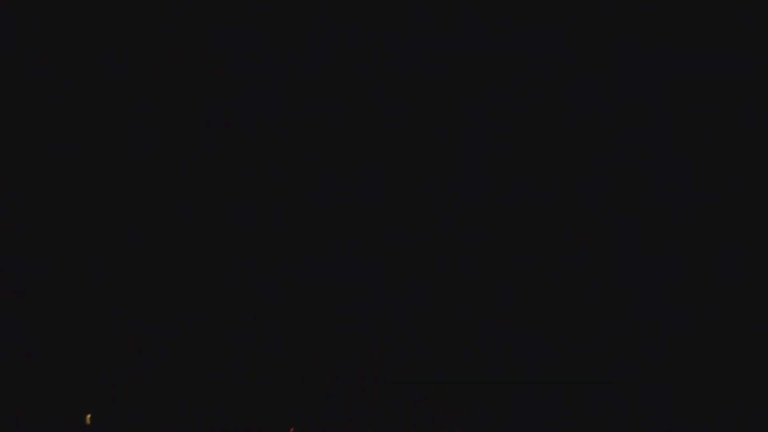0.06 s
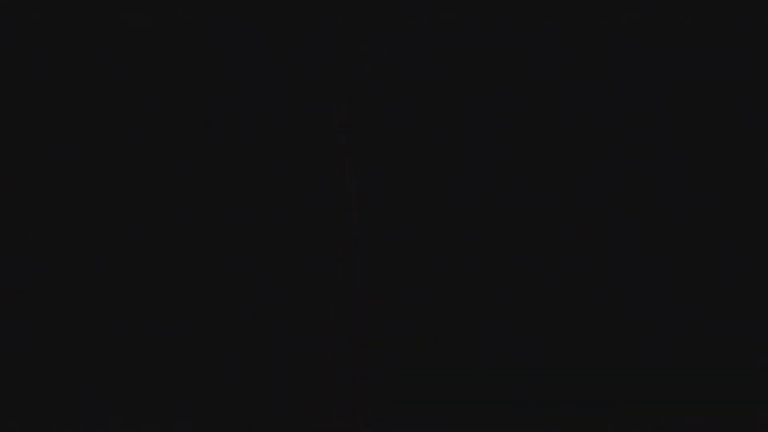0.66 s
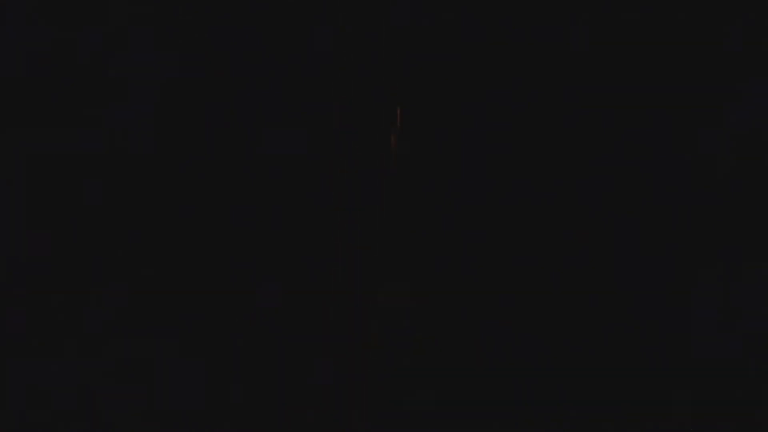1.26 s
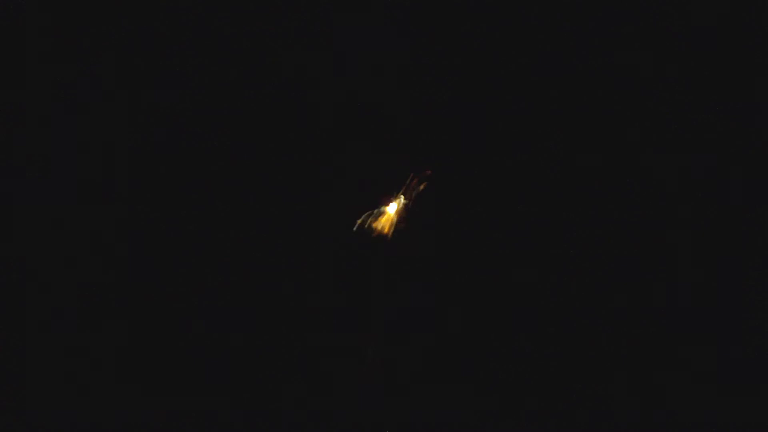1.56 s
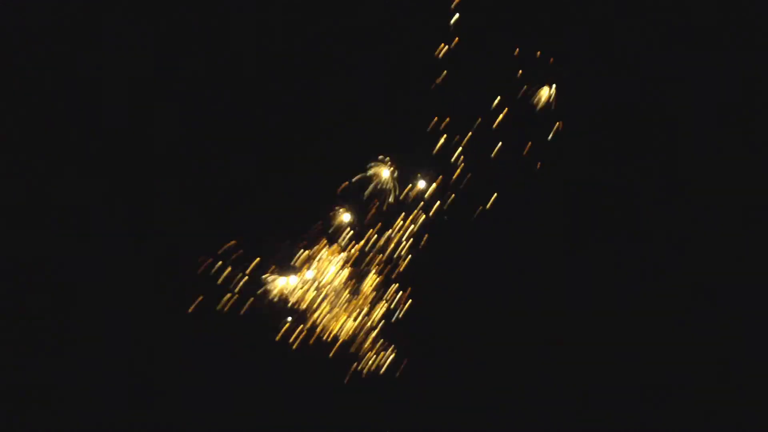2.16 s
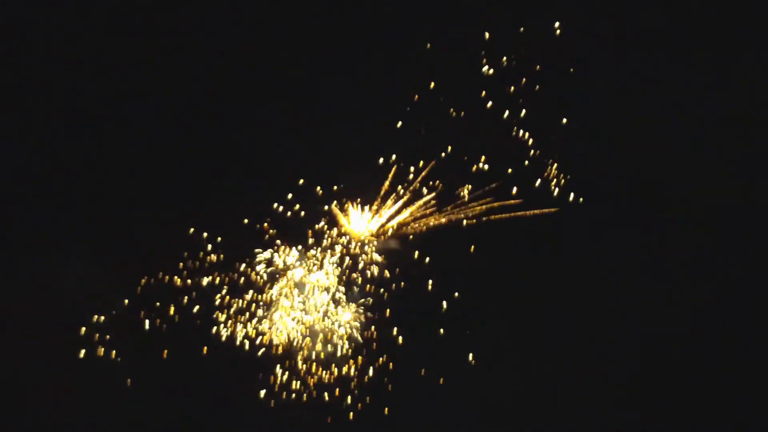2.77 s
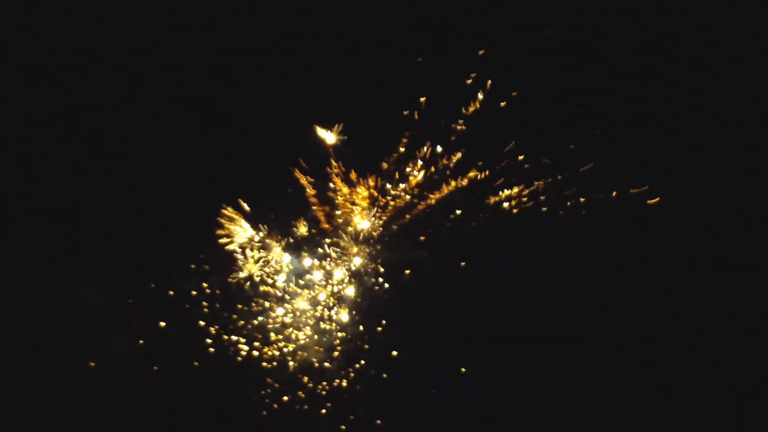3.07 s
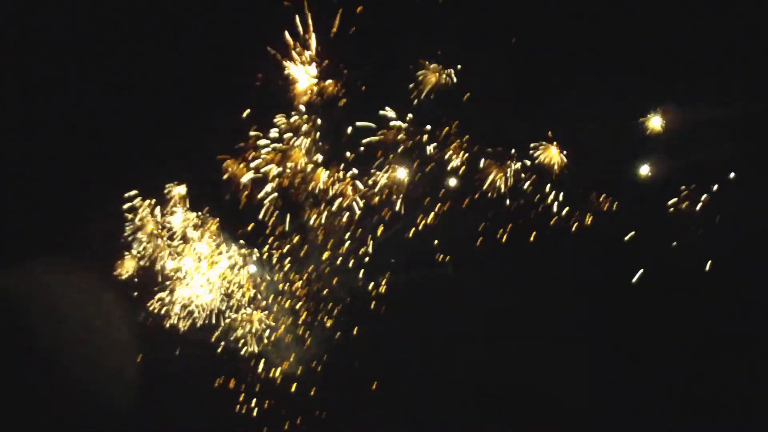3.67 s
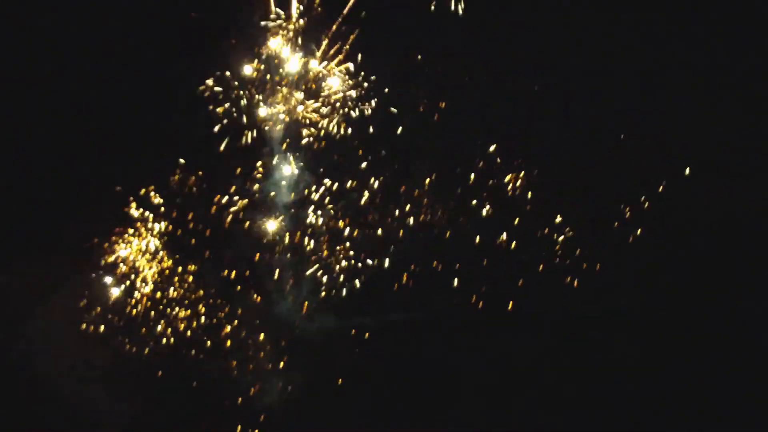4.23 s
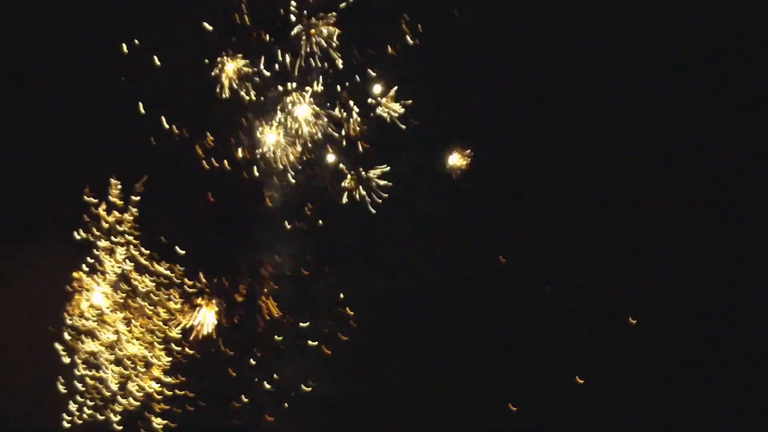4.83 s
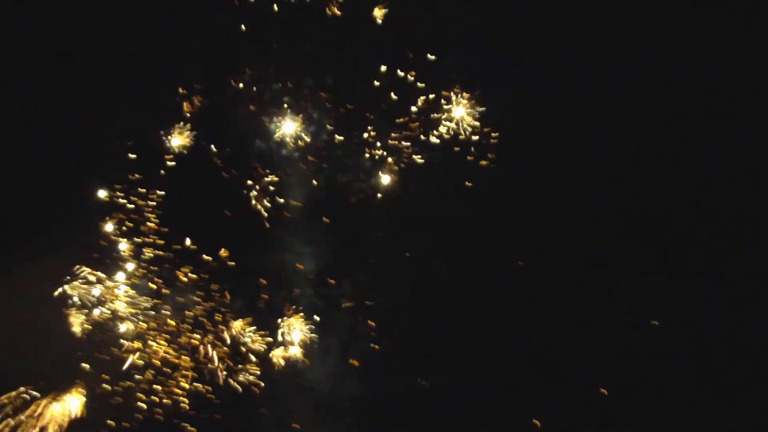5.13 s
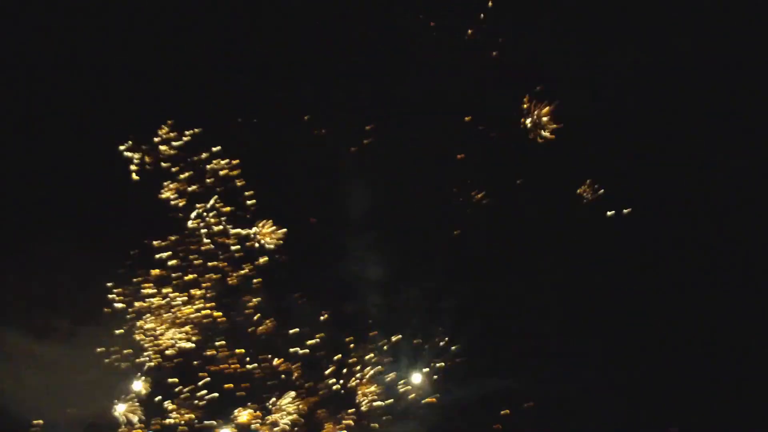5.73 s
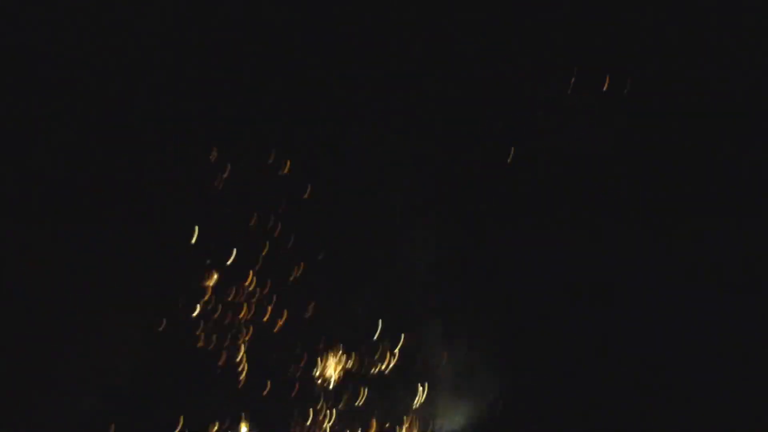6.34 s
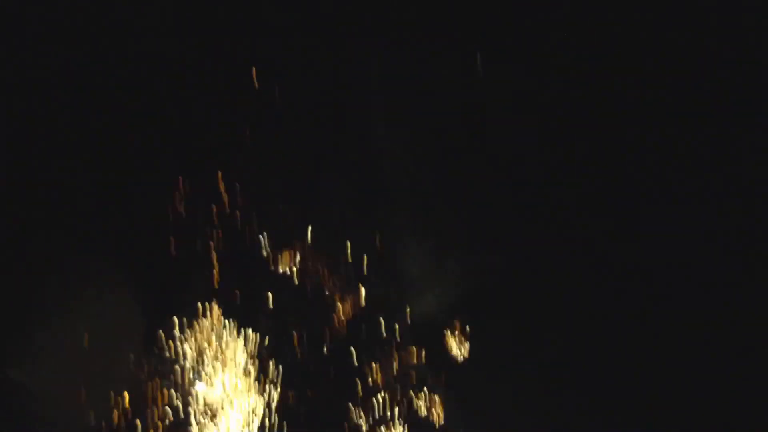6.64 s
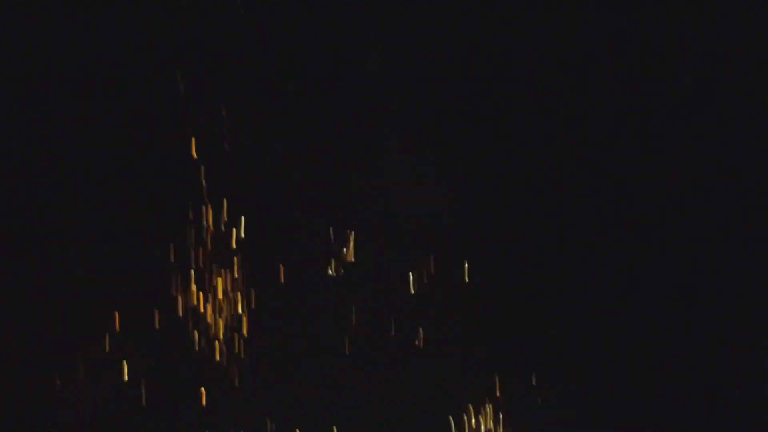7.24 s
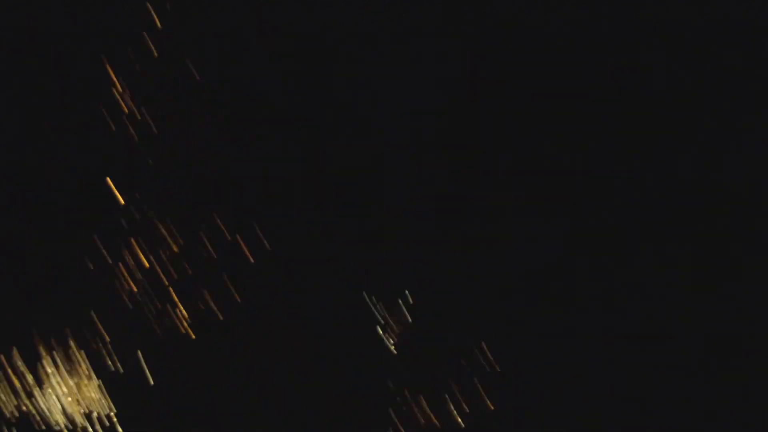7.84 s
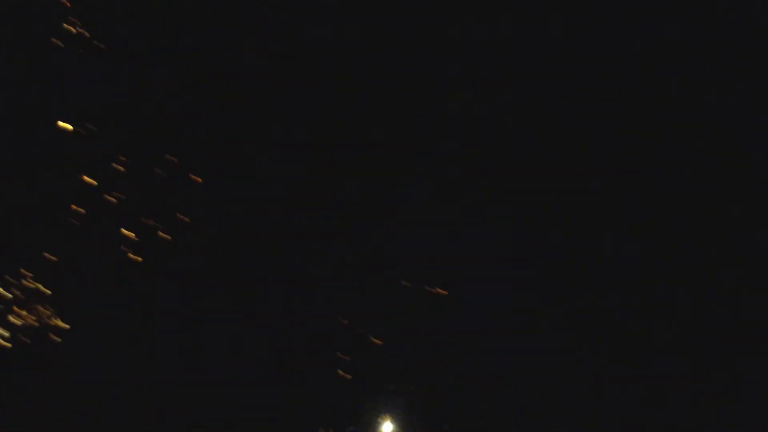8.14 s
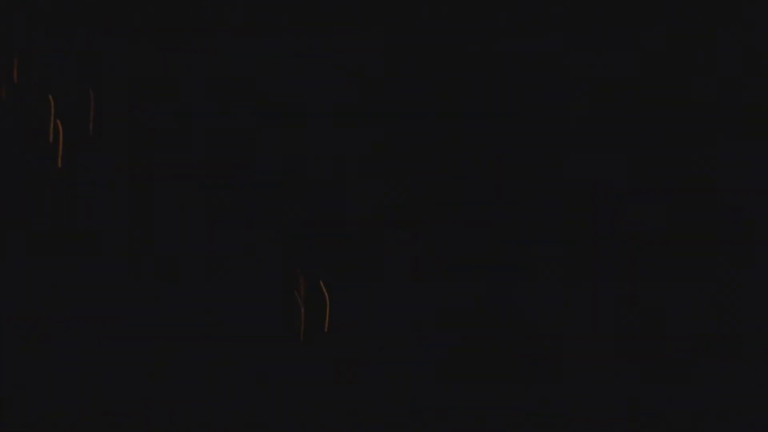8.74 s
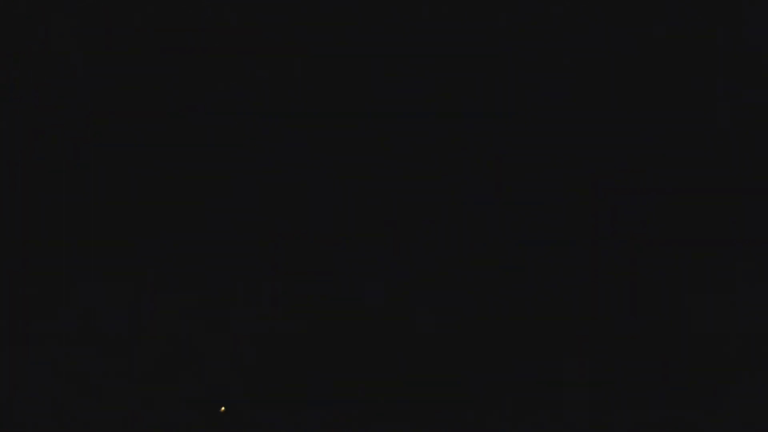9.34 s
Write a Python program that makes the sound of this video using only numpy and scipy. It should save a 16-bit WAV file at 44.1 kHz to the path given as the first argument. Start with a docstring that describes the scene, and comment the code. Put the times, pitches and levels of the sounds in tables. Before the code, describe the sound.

Two launch thumps lead into a run of loud, echoing firework bangs and sizzling crackle, with light wind on the microphone.

```python
"""A firework battery fires into the night sky, heard outdoors among houses on a small, wind-buffeted mic.
Two lift charges thump, a wall throws each back, and the climbing comets hiss. Shells burst overhead in
sharp double bangs, direct and off the ground, and roll back from distant houses. Their stars crackle
densely as the grains explode, thinning to a few last cracks over faint night noise.
The microphone overloads on the bangs and passes only a narrow band."""
import sys
import numpy as np
from scipy import signal
from scipy.fft import rfft, irfft
from scipy.io import wavfile
from scipy.ndimage import uniform_filter1d

SR = 44100
rng = np.random.default_rng(int(sys.argv[2]) if len(sys.argv) > 2 else 0)


def put_to_file(sound):
    """Save the sound as 16-bit audio at rate SR, in the file named by the first command-line argument."""
    columns = np.atleast_2d(sound).T  # one column per channel
    safe = np.clip(columns, -1, 1)
    whole_steps = np.round(safe * 32767)
    wavfile.write(sys.argv[1], SR, whole_steps.astype(np.int16))


N = 418950
TIME = np.arange(N) / SR

# Shells overhead; levels in all tables are relative, ahead of each layer's gain:
# (time [s], bang [dB], ground reflection lag [s], pitch [Hz], rolling echo [dB], crackling cloud [dB])
SHELLS = [(1.8601, 6, 0.0083, 699, -18.5, -22), (2.146, 14, 0.0082, 1180, -10, -22),
          (2.701, 7.5, 0.0085, 1130, -16.5, -24), (2.9418, 9.5, 0.0094, 700, -17, -43),
          (3.200, 10, 0.0089, 674, -9.5, -24), (3.3501, 15, 0.0091, 636, -22, -23.5),
          (3.7376, 12, 0.0086, 1110, -13, -33), (4.058, 1, 0.0093, 1170, -13.5, -24.5),
          (4.2754, 15, 0.0092, 667, -11, -23.5), (4.6055, 9.5, 0.0092, 675, -12.5, -24),
          (4.8691, 5, 0.0083, 677, -16, -21.5), (5.08, 8.5, 0.0082, 1120, -10.5, -25.5),
          (5.337, 11.5, .008, 1130, -11.5, -24), (5.628, 2, 0.0081, 1202, -15, -31.5),
          (6.048, 12, 0.0065, 1160, -19.5, -20), (6.3452, 12, 0.0069, 1130, -14, -21.5),
          (6.6424, 16, 0.0063, 1166, -13.5, -42), (6.877, -1, 0.0051, 1280, -16.5, -28.5),
          (7.163, 4.5, 0.0046, 869, -16.5, -28.5)]
# spectrum of a dull thud: (frequency [Hz], level [dB])
THUD_SPECTRUM = [(30, -1.5), (130, 5), (350, -2.5), (550, -18.5), (1100, -13.5), (3000, -23.5),
                 (7000, -32.5)]


def from_db(db):
    """Decibels to gain."""
    return 10 ** (np.asarray(db) / 20)


def rms_one(x):
    """Scale to unit rms."""
    return x / np.sqrt(np.mean(x ** 2) + 1e-20)


def level(rows, column=1):
    """Gain over time from a dB column, silent outside its span."""
    rows = np.array(rows)
    return from_db(np.interp(TIME, rows[:, 0], rows[:, column], left=-140, right=-140))


def at_hz(points, hz):
    """Read a table on a log-frequency axis."""
    points = np.array(points)
    return np.interp(np.log(np.maximum(hz, 1)), np.log(points[:, 0]), points[:, 1])


def colour(x, spectrum, size=8192):
    """Causal (minimum-phase) filter with the given spectrum and unit energy."""
    cepstrum = irfft(np.log(from_db(at_hz(spectrum, np.fft.rfftfreq(size, 1 / SR)))))
    cepstrum[1:size // 2] *= 2
    cepstrum[size // 2 + 1:] = 0
    response = irfft(np.exp(rfft(cepstrum)))
    return signal.oaconvolve(x, response / np.linalg.norm(response))[:len(x)]


def drift(per_s, size=4096):
    """A random wander of unit rms."""
    return rms_one(np.interp(TIME * per_s, np.arange(size), rng.standard_normal(size)))


def noise(spectrum, grit_db=0):
    """Coloured noise of unit rms; grit breaks it into grains."""
    grit = from_db(grit_db * np.minimum(drift(700, size=8192), 2.5))
    white = rng.standard_normal(N) * grit
    return rms_one(colour(np.concatenate([white[-SR:], white]), spectrum)[SR:])


def even(x, window_s):
    """Hold the running rms near 1."""
    power = np.abs(uniform_filter1d(x ** 2, max(int(window_s * SR), 2)))
    return x / np.sqrt(power + 1e-3 * np.mean(x ** 2))


def add(out, s, sound):
    """Mix a sound in at s seconds."""
    i = max(int(round(s * SR)), 0)
    out[i:i + len(sound)] += sound[:max(N - i, 0)]


def night():
    """Distant night noise and a faint hiss around the battery."""
    # background: (time [s], distant noise [dB], hiss [dB])
    levels = [(0, -45.5, -40.5), (1.3, -49, -45.5), (1.8, -47.5, -42), (8.7, -46.5, -50), (9.5, -46.5, -71)]
    # spectra of the distant noise and of the hiss: (frequency [Hz], level [dB])
    distant_spectrum = [(30, 4), (150, 4.5), (450, -1.5), (800, 6), (1300, -6), (3000, -12), (7000, -17)]
    hiss_spectrum = [(500, -2), (2500, 0.5), (4000, -0.5), (7000, -6.5)]
    return level(levels, 1) * noise(distant_spectrum) + level(levels, 2) * noise(hiss_spectrum)


def wind(gain_db=-3.5, gust_db=2, gusts_per_s=9):
    """Lumpy low pressure swings right at the microphone port, gusting about the wind's strength."""
    # wind on the microphone: (time [s], level [dB])
    strength = [(0.0, -8), (1.08, -20.5), (1.64, -7.5), (1.74, -15.5), (1.85, -3), (1.9, -18.5), (2.49, -7),
                (2.54, -12), (3.75, -24), (4.15, -32), (4.21, -19), (4.71, -31.5), (7.06, -25), (7.17, -13),
                (7.2, -19), (8.65, -34.5), (9.37, -32), (9.5, -41)]
    # its rumble: (frequency [Hz], level [dB])
    spectrum = [(8, 4.5), (20, 1.5), (36, 4.5), (60, -3.5), (110, -10.5), (170, -22), (300, -34.5),
                (1500, -51), (7000, -80)]
    gusts = from_db(gain_db + gust_db * drift(gusts_per_s))
    return gusts * level(strength) * even(noise(spectrum), window_s=0.15)


def buffets():
    """An eddy passing the microphone port sucks, then pushes."""
    # single eddies: (time [s], peak [dB], period [s])
    eddies = [(0.181, -7, 0.018), (0.255, -2.5, 0.022), (1.337, -8.5, 0.036), (1.53, -2, 0.013),
              (1.652, -0.5, 0.027), (1.832, -3, 0.036), (2.33, -6, 0.015), (2.446, -3.5, 0.017),
              (9.3, -23, 0.052)]
    out, t = np.zeros(N), TIME[:SR // 4] - 1 / 8
    for s, db, period in eddies:
        phase = 2 * np.pi * t / period
        add(out, s + t[0], from_db(db) * phase * np.exp((1 - phase ** 2) / 2))
    return out


def blast(spectrum, decay_s, front, size=4096):
    """A shock front and the turbulence behind it, with the energy of unit rms held for decay_s."""
    turbulence = rng.standard_normal(size) * np.exp(-TIME[:size] / decay_s)
    turbulence[0] = front * np.linalg.norm(turbulence)
    wave = colour(turbulence, spectrum)
    return wave / np.sqrt(np.sum(wave ** 2) / (decay_s * SR))


def swing(hz, cycles, slowing, size=4096):
    """The pressure swing of an explosion: a short push, then a longer suction, soon gone."""
    turns = np.log1p(slowing * hz * TIME[:size]) / slowing
    return np.sin(2 * np.pi * turns) * np.exp(-(turns / cycles) ** 2)


def launches(wall_lag_s=0.0655, wall_db=-11):
    """Each lift charge pushes out a pressure wave with a spitting blast; a wall throws the blast back."""
    # lift charges: (time [s], level [dB], length of the push [s])
    charges = [(0.3888, 16.5, 0.028), (1.847, 14, 0.00093)]
    # their spitting blast: (frequency [Hz], level [dB])
    spit_spectrum = [(30, 9), (150, -4.5), (380, 8), (600, 2.5), (1000, 5), (2800, 5), (7000, -5.5)]
    out, t = np.zeros(N), TIME[:4096]
    for s, db, push_s in charges:
        push = (1 - t / push_s) * np.exp(-t / push_s)
        echo_s, echo_gain = s + wall_lag_s, from_db(db + wall_db)
        add(out, s, from_db(db - 5) * push)
        add(out, s + 0.003, from_db(db - 2) * blast(spit_spectrum, decay_s=0.0059, front=1))
        add(out, s + 0.00714, from_db(db - 15) * swing(hz=141.5, cycles=1.35, slowing=0.38))
        add(out, echo_s, echo_gain * blast(spit_spectrum, decay_s=0.0026, front=0.34))
        # the low thud and its own echo
        add(out, s + 0.0046, from_db(db - 5.5) * blast(THUD_SPECTRUM, decay_s=0.0071, front=0.095))
        add(out, echo_s + 0.0062, echo_gain * blast(THUD_SPECTRUM, decay_s=0.0014, front=1))
    return out


def outdoors(x, near_db=-14, near_s=0.032, far_db=-19, build_up_s=0.0046, slap_s=0.058, width_s=0.013):
    """Nearby walls and trees scatter a short wash with one slap; a far tail dies first in the treble."""
    # far reverberation: (frequency [Hz], time to fall 60 dB [s])
    tail_t60 = [(100, 2.5), (800, 2.54), (3000, 1.1), (7000, 0.62)]
    # scattered sound grazes the ground, which cancels the low middle: (frequency [Hz], level [dB])
    grazing_spectrum = [(60, -1.5), (200, -2), (450, -6), (750, -1), (1100, -3), (1700, -5), (3200, 2),
                        (7000, 3.5)]
    t, edges_hz = TIME[:SR], np.geomspace(40, 12000, 8)
    white, far = rng.standard_normal(SR), np.zeros(SR)
    for low, high in zip(edges_hz, edges_hz[1:]):
        band_pass = signal.butter(2, [low, high], "band", fs=SR, output="sos")
        band = signal.sosfilt(band_pass, rng.standard_normal(SR))
        far += band * from_db(-60 * t / at_hz(tail_t60, np.sqrt(low * high)))
    build_up = 1 - np.exp(-(t / build_up_s) ** 2)
    wall = 1 + np.exp(-((t - slap_s) / width_s) ** 2)
    near = white * np.exp(-t / near_s) * build_up * wall
    far *= build_up
    response = from_db(near_db) * near / np.linalg.norm(near)
    response += from_db(far_db) * far / np.linalg.norm(far)
    return signal.fftconvolve(x, colour(response, grazing_spectrum))[:N]


def shifting_echoes(x, moves_per_s=23, places=4):
    """The pops come from ever-changing places in the sky, and each place scatters differently."""
    place = TIME * moves_per_s
    shares = [np.clip(1 - np.abs((place - k + 1) % places - 1), 0, 1) for k in range(places)]
    return sum(outdoors(x * np.sqrt(share)) for share in shares)


def comet_rush(hiss_db=3, rumble_db=2, sputter_db=3, surge_db=0.9):
    """Burning comet tails sputter and hiss while the launch rolls round the neighbourhood."""
    # one list for each launch: (time [s], hiss [dB], rumble [dB])
    climbs = [
        [(0.41, -42, -51), (0.438, -50, -33), (0.495, -34, -28), (0.545, -21.5, -23), (0.585, -26, -22),
         (0.62, -23.5, -24), (0.665, -21, -21.5), (0.7, -35.5, -24), (0.77, -37, -25), (0.912, -46, -31.5),
         (1.158, -55, -52), (1.3, -68, -66)],
        [(1.88, -44, -43), (1.945, -31, -32), (2.016, -23, -23), (2.066, -20.5, -18), (2.234, -25.5, -26.5),
         (2.39, -28, -27), (2.47, -42, -26)],
    ]
    # spectra of the tails' hiss and of the launch's rumble: (frequency [Hz], level [dB])
    hiss_spectrum = [(100, -32), (400, 2), (700, -2), (1100, 1.5), (1600, -7.5), (3200, -3.5), (4200, -7.5),
                     (6500, -10.5), (9000, -55)]
    rumble_spectrum = [(40, -20.5), (130, 13.5), (350, 3), (550, -18), (1500, -34)]
    hiss = noise(hiss_spectrum, grit_db=1.5)
    hiss *= from_db(hiss_db + sputter_db * drift(220) + surge_db * drift(35.24))
    rumble = noise(rumble_spectrum) * from_db(rumble_db)
    return sum(hiss * level(climb, 1) + rumble * level(climb, 2) for climb in climbs)


def thuds():
    """Low knocks roll in from the surroundings after a launch."""
    # arrivals at the microphone: (time [s], level [dB])
    knocks = [(0.423, -8), (.527, -15), (0.556, -13), (.634, -8.5), (.790, -12.5), (0.812, -13),
              (1.983, -12), (2.099, -7.5), (2.273, -6.5)]
    out = np.zeros(N)
    for s, db in knocks:
        add(out, s, from_db(db) * blast(THUD_SPECTRUM, decay_s=0.0071, front=0.69))
    return out


def house_slaps():
    """Single house fronts throw a blast back as a short, hollow slap."""
    # echoes off house fronts: (time [s], level [dB])
    arrivals = [(.556, -20), (0.79, -15), (.872, -25), (.896, -25), (2.2, -24), (3.243, -8), (3.259, -9.5),
                (4.331, -24), (5.385, -7.5), (6.672, -13)]
    # their hollow tone: (frequency [Hz], level [dB])
    spectrum = [(150, 1), (600, -6), (1050, -0.5), (1500, -19), (5000, -38)]
    out = np.zeros(N)
    for s, db in arrivals:
        add(out, s, from_db(db) * blast(spectrum, decay_s=0.0049, front=0.32))
    return out


def snaps(shocks, bounce, scatter, bounce_s=0.00189, scatter_s=0.0017, size=512):
    """Tiny shocks (time [s], height): a spike, brief scatter and a reflection close to the microphone."""
    # an exploding grain: (frequency [Hz], level [dB])
    spectrum = [(40, -7), (150, -3.5), (350, 1.5), (800, -1), (1200, 3), (1600, 1), (2400, 0.5),
                (3200, 1.5), (4000, -3), (5500, -2), (7000, -9), (12000, -32)]
    out = np.zeros(N)
    for s, height in shocks:
        shock = scatter * rng.standard_normal(size) * np.exp(-TIME[:size] / scatter_s)
        shock[0] = 1
        lag = int(np.clip(bounce_s * SR * rng.normal(1, 0.07), 1, size // 2))
        shock[lag] += bounce / 2
        shock[lag + int(0.00018 * SR)] -= bounce
        add(out, s, height * shock)
    return colour(out, spectrum)


def ground_lag(s):
    """Seconds by which the ground reflection trails a pop: ever fewer as the stars sink."""
    # reflection at the microphone: (time [s], lag [s])
    lags = [(2.4, 0.0094), (4.6, 0.0089), (6.2, 0.0069), (7.1, 0.0048), (8.3, .0035), (8.85, 0.0011)]
    return np.interp(s, *np.transpose(lags))


def cracks(pops, spike_db=12, body_db=-6, body_hz=920, bite_db=-5, bite_hz=3050, ground_db=-12):
    """Big grains stand out one by one, each with a sharp bite, a short body and a ground reflection."""
    reflections = [(s + ground_lag(s) * rng.normal(1, 0.08), db + rng.normal(ground_db, 4))
                   for s, db in pops]
    shocks = [(s, from_db(db + spike_db)) for s, db in pops + reflections]
    spikes = snaps(shocks, bounce=0.43, scatter=0.058, scatter_s=0.0019)
    body = np.zeros(N)
    for s, db in pops:
        pitch_hz = body_hz * from_db(rng.normal(0, 3.23))
        add(body, s, from_db(db + body_db) * grain_swing(pitch_hz, cycles=0.8))
        add(body, s, from_db(db + bite_db) * grain_swing(bite_hz, cycles=1.33))
    low_cut = signal.butter(2, 620, "high", fs=SR, output="sos")
    return spikes + signal.sosfilt(low_cut, body)


def grain_swing(hz, cycles, size=4096):
    """The pressure swing of a big grain: over, under, and gone in a few cycles."""
    turns = hz * TIME[:size]
    return np.sin(2 * np.pi * turns) * np.exp(-turns / cycles)


def shell_bursts(gain_db=3, swing_hz=1500, swings_s=0.002, loss_db=2.5, ring_s=0.0012, ground_hz=760):
    """A bang overhead: quick swings ring briefly at its pitch; a slower one follows off the ground."""
    # a shell's blast: (frequency [Hz], level [dB])
    spectrum = [(30, -4), (110, -1), (250, -3.5), (600, -1.5), (1200, -0.5), (1700, -12.5), (3200, -16.5),
                (7000, -23)]
    out = np.zeros(N)
    for s, db, lag_s, hz, _, _ in SHELLS:
        quick_swing = swing(swing_hz * from_db(rng.standard_normal()), cycles=0.83, slowing=1.13)
        add(out, s, from_db(db - 1) * blast(spectrum, decay_s=0.0016, front=0.29))
        add(out, s, from_db(db - 2) * swing(hz, cycles=ring_s * hz, slowing=0.012))
        for k, delay_s in enumerate(np.arange(0, swings_s, 1 / hz)):
            add(out, s + delay_s, from_db(db - k * loss_db) * quick_swing)
        ground_swing = swing(ground_hz * from_db(rng.standard_normal()), cycles=0.77, slowing=1.095)
        ground_blast = from_db(-6) * blast(spectrum, decay_s=0.0013, front=0.73)
        add(out, s + lag_s, from_db(db - 1) * (ground_swing + ground_blast))
    return from_db(gain_db) * out


def distant_roll(gain_db=-5.5, delay_s=0.047, decay_s=0.15, grit_db=-1.5, echoes_per_s=300):
    """Distant houses answer each bang with a rough cluster of echoes, new for every place in the sky."""
    # the houses' dull answer: (frequency [Hz], level [dB])
    spectrum = [(60, 1), (220, -0.5), (550, 4), (1000, 6.5), (1300, 0), (1700, -5), (5000, -14)]
    out, t = np.zeros(N), TIME[:SR]
    for s, _, _, _, roll_db, _ in SHELLS:
        roughness = np.interp(t * echoes_per_s, np.arange(1024), rng.uniform(-1.2, 1.2, size=1024))
        envelope = rms_one(from_db(grit_db * roughness)) * np.exp(-t / decay_s)
        add(out, s + delay_s, from_db(roll_db + gain_db) * envelope * rng.standard_normal(SR))
    return colour(out, spectrum)


def star_clouds(smoulder_s=0.527, catch_s=0.15, burn_s=0.22, burn_out_s=0.43):
    """Loudness of the stars: each shell's cloud smoulders, catches, crackles and burns out; powers add."""
    # single stars shatter into a flurry of sizzle: (peak time [s], level [dB], half length [s])
    flurries = [(2.585, -13, 0.014), (2.682, -16, 0.024), (3.37, -15, 0.018), (3.502, -23, .02),
                (3.837, -15.5, 0.029), (3.948, -18, 0.039), (4.02, -16, .025), (4.44, -16, 0.012),
                (4.765, -16.5, 0.1), (5.563, -14, 0.037), (5.744, -32, 0.036), (5.956, -18, 0.021),
                (6.003, -15, 0.019), (6.441, -17.5, 0.031), (6.754, -18.5, 0.023), (7.29, -17, 0.027),
                (7.457, -18.5, 0.042)]
    power = np.zeros(N)
    for s, *_, cloud_db in SHELLS:
        age = TIME - s - smoulder_s
        swell = np.clip(age / catch_s, 0, 1)
        fade = np.exp(-np.maximum(age - catch_s - burn_s, 0) / burn_out_s)
        power += (from_db(cloud_db) * swell * fade) ** 2
    for s, db, half_s in flurries:
        power += from_db(db) ** 2 / (1 + ((TIME - s) / half_s) ** 2) ** 2
    return np.sqrt(power)


def pop_rates():
    """Pops per second over time, for the tiny grains and for the middling cracks."""
    # exploding grains: (time [s], tiny grains [1/s], middling cracks [1/s])
    rates = [(2.4, 365, 4), (3.2, 553, 4), (4, 890, 5), (5.7, 897, 5), (6.4, 330, 3), (7.201, 398, 5),
             (8.0, 109.5, 0)]
    times, tiny, middling = np.transpose(rates)
    return [np.interp(TIME, times, per_s, left=0, right=0) for per_s in (tiny, middling)]


def crackle(gain_db=2.5, clump_db=5.5, spread_db=4.5, flare_db=1.27, flares_per_s=30, dense_per_s=1200):
    """Stars pop in clumps of many tiny grains and a few big ones; the fewer burn, the deeper the lulls."""
    per_s, _ = pop_rates()
    pop_times = TIME[rng.random(N) < per_s * from_db(clump_db * drift(55)) / SR]
    sizes = from_db(spread_db * np.minimum(rng.exponential(1, len(pop_times)), 4.2))
    grains = snaps(zip(pop_times, sizes), bounce=0.15, scatter=0.02)
    sparseness = np.sqrt(dense_per_s / np.maximum(per_s, dense_per_s / 10))
    flare = from_db(flare_db * sparseness * np.minimum(drift(flares_per_s), 1))
    return from_db(gain_db) * flare * star_clouds() * even(grains, window_s=0.062)


def off_ground(sizzle, gain_db=-5, band_hz=(170, 700)):
    """The sizzle reaches the microphone again off the ground, late and dull."""
    dull = signal.butter(1, band_hz, "band", fs=SR)
    delayed = np.interp(TIME - ground_lag(TIME), TIME, sizzle)
    return from_db(gain_db) * signal.lfilter(*dull, delayed)


def middling_cracks(mean_db=-7.5, spread_db=2, count=200):
    """Cracks between the loudest, as (time [s], level [dB]): one at random in each slot of their rate."""
    _, per_s = pop_rates()
    due = np.cumsum(per_s) / SR
    turns = np.arange(count) + rng.random(count)
    levels_db = rng.normal(mean_db, spread_db, count)
    return [(np.searchsorted(due, turn) / SR, db) for turn, db in zip(turns, levels_db) if turn < due[-1]]


def scene():
    """At one microphone below the display: fireworks and their echoes over wind and night noise."""
    # the loudest single cracks: (time [s], level [dB])
    loud_cracks = [(1.008, -33), (2.4219, -4.5), (2.4728, 3), (2.482, 5), (2.5, -5), (2.5126, -4),
                   (2.52, -3.5), (2.5518, -5), (2.581, -12), (2.651, -2), (2.6808, -2), (2.795, -3),
                   (2.877, -2), (2.888, -15), (2.933, 1), (3.0724, -5), (3.0967, 2), (3.1327, -5),
                   (3.3285, -2), (3.429, -2.0), (3.4797, -1), (3.505, -7), (3.5214, 0.5), (3.5819, 3.5),
                   (3.5954, -3), (3.643, -0.5), (3.698, -3), (3.931, -7), (3.9598, -2), (3.994, -3),
                   (4.2, 1), (4.248, -4), (4.37, 2), (4.442, 5.5), (4.459, 2), (4.485, 1), (4.493, -4),
                   (4.545, 3), (4.552, -2), (4.564, 1), (4.5805, 5), (4.658, -4), (4.72, -8), (4.7795, -5),
                   (4.846, -6), (4.855, -12), (4.9658, 4), (5.0075, 3), (5.03, 1.5), (5.0378, 1),
                   (5.069, -8), (5.1608, -3), (5.211, -0.5), (5.2857, 6), (5.4468, 3.5), (5.518, -2),
                   (5.57, -4), (5.584, -2), (5.7144, 2), (5.742, 3.5), (5.8576, 2.5), (5.867, 0),
                   (5.9023, -0.5), (5.959, -2), (6.061, -2), (6.111, -11), (6.126, -4), (6.1721, 3.5),
                   (6.2332, 1.5), (6.2916, 3), (6.313, -1), (6.407, 2.5), (6.455, 0.5), (6.462, 1),
                   (6.5317, 5), (6.586, 0.5), (6.846, 1.5), (6.857, -3), (6.946, 1.5), (7.057, 4.5),
                   (7.1251, 4), (7.2043, -2.0), (7.2425, -4), (7.2985, -1.5), (7.332, 5), (7.3892, 2),
                   (7.4223, 1.5), (7.431, -13), (7.452, -3), (7.4643, -3), (7.497, -2), (7.542, 7.5),
                   (7.5798, 1.5), (7.61, 10), (7.6676, 3.5), (7.6802, 2), (7.701, 0), (7.7217, 2),
                   (7.73, 2), (7.747, -6), (7.7946, -8), (7.822, -12), (7.83, -4), (7.8466, 2.5),
                   (7.8595, 3), (7.8811, -1.5), (7.912, -1.5), (7.9273, 10.5), (7.9539, -1.5), (7.9867, -6),
                   (8.0032, 3), (8.022, -6), (8.0491, 1), (8.0812, -4), (8.0984, 3.5), (8.1185, 0),
                   (8.125, 4), (8.1691, -7.5), (8.2245, 4), (8.229, 2.5), (8.317, 3), (8.3447, 2),
                   (8.4277, -4.5), (8.4883, -16), (8.6495, -4), (8.853, 3)]
    lift, bangs, sizzle = launches(), shell_bursts(), crackle()
    pops = loud_cracks + middling_cracks()
    bare_cracks = snaps([(s, from_db(db)) for s, db in pops], bounce=0, scatter=0)
    to_surroundings = (from_db(-5) * lift + from_db(-8) * bangs
                       + from_db(11.5) * bare_cracks + from_db(4.5) * sizzle)
    echoes = shifting_echoes(to_surroundings) + distant_roll() + house_slaps()
    background = night()
    fireworks = lift + bangs + cracks(pops) + sizzle + off_ground(sizzle) + thuds() + comet_rush()
    return (fireworks + echoes + wind() + buffets() + background)[None]


def record(dry, overload=0.91, mic_band_hz=7050, cutoff_hz=16000):
    """The microphone input overloads, a speech-band low-pass follows, and its overshoot clips again."""
    mic_band = signal.ellip(8, 0.5, 70, mic_band_hz, fs=SR, output="sos")
    top_cut = signal.cheby2(12, 70, cutoff_hz, fs=SR, output="sos")
    narrow = signal.sosfilt(mic_band, np.clip(dry, -overload, overload))
    return signal.sosfilt(top_cut, np.clip(narrow, -1, 1))


dry = scene()
out = record(dry)
put_to_file(out)
```